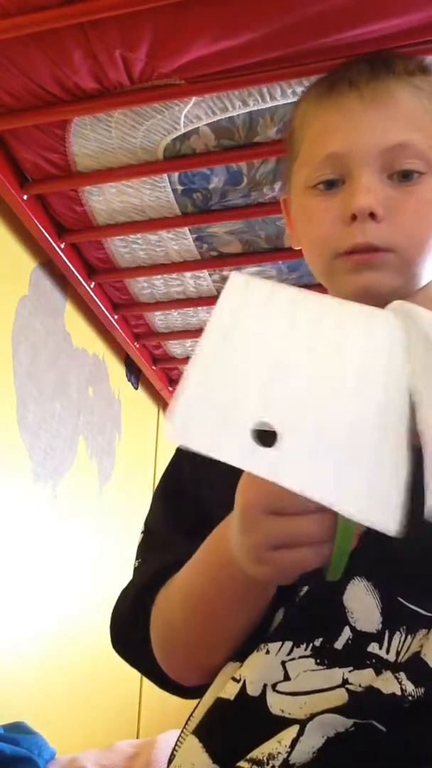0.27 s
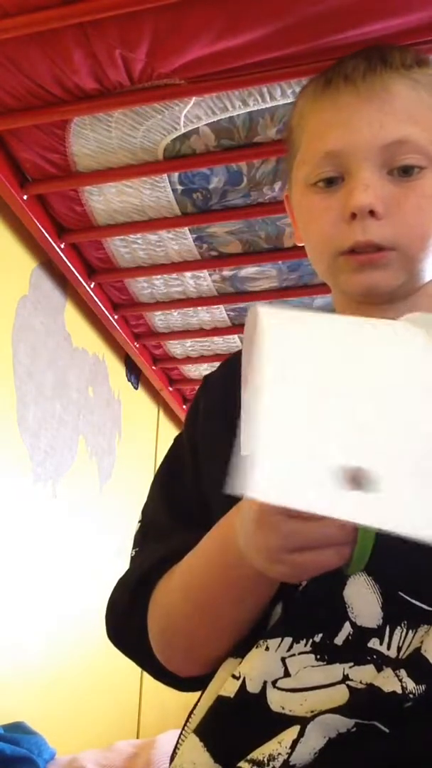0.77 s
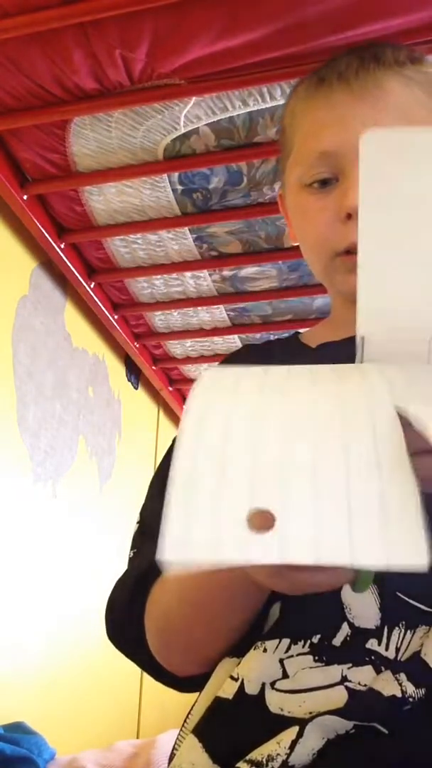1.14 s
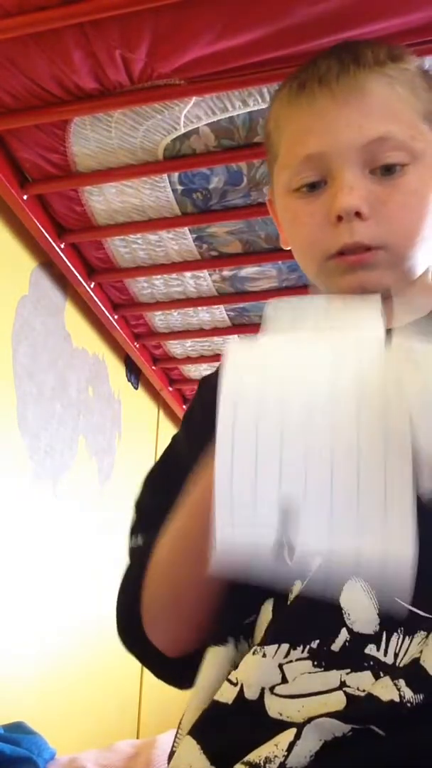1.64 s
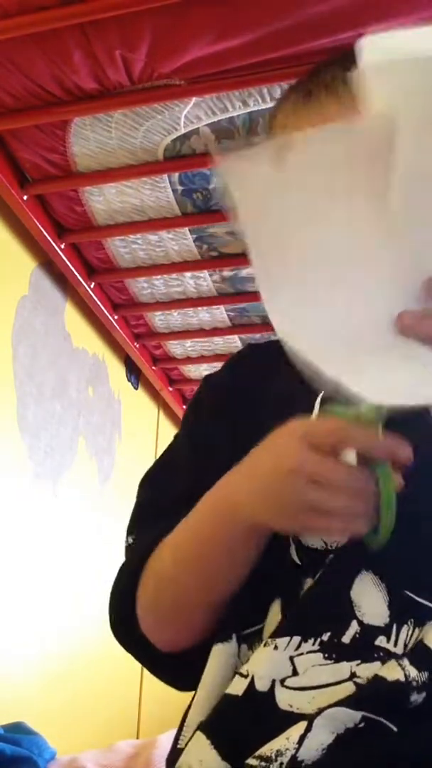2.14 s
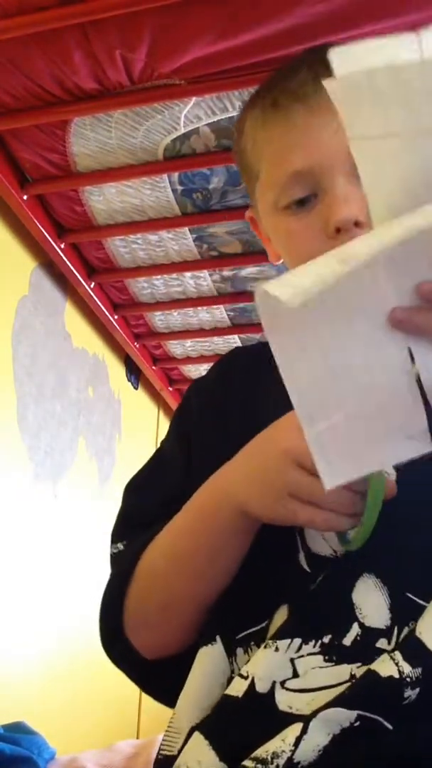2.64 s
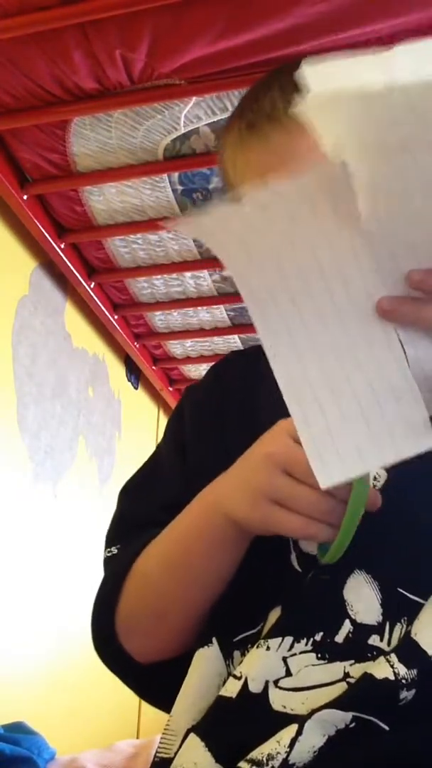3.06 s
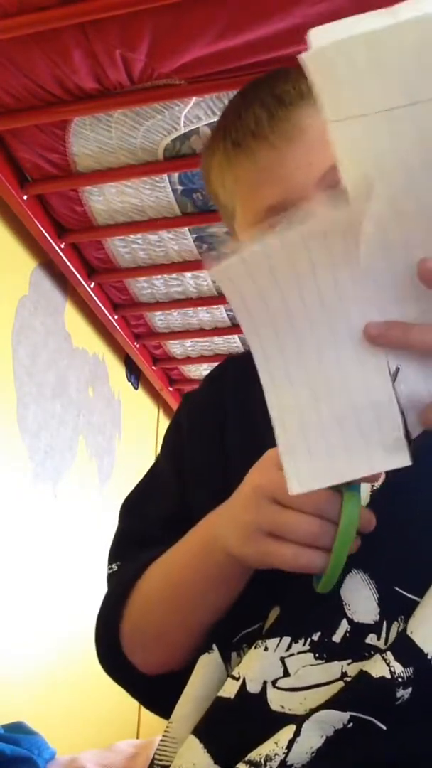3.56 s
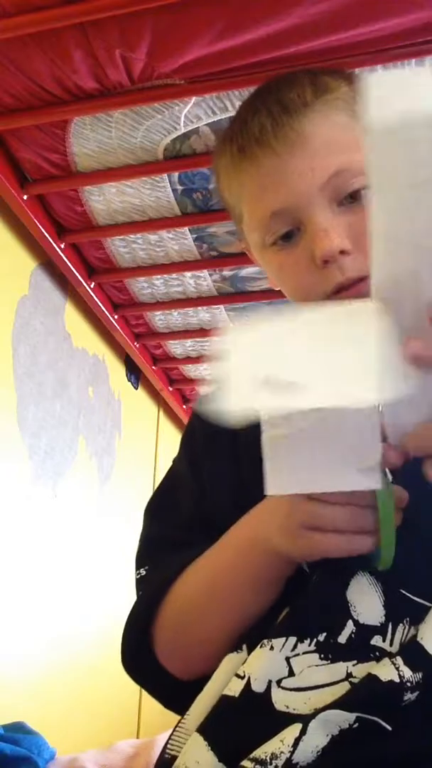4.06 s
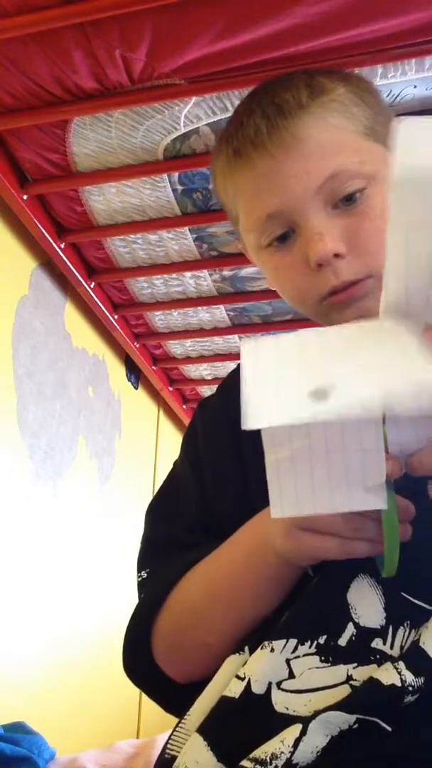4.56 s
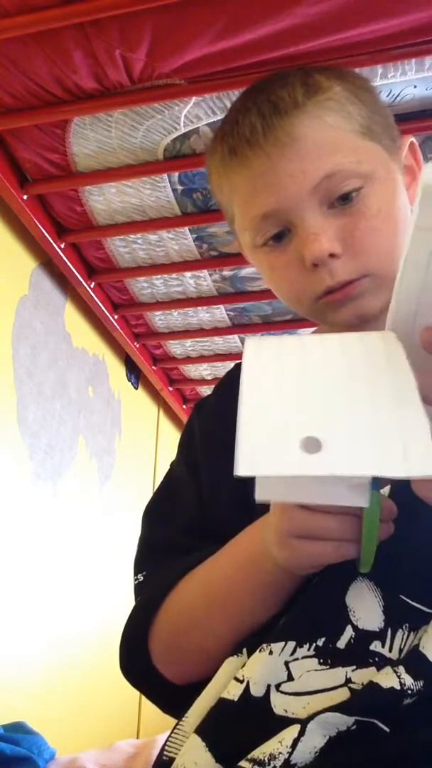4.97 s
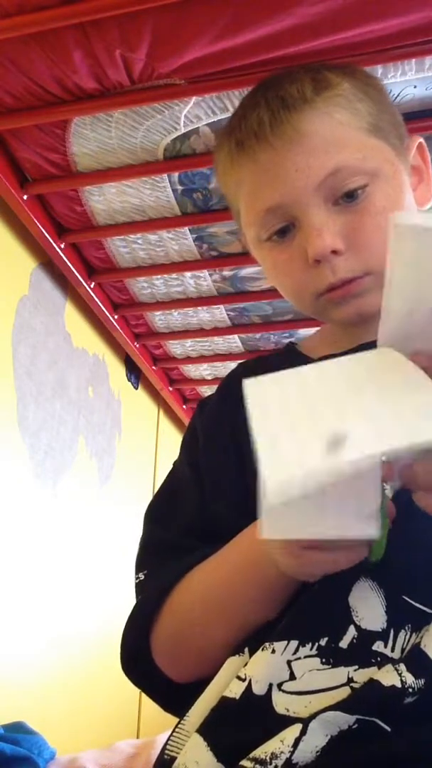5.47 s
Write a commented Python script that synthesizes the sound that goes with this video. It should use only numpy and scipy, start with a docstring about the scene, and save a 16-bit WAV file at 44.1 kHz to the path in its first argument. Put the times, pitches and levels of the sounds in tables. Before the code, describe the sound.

A sheet of notebook paper is turned over and folded by hand, close to the microphone in a small furnished room. It rustles in short, uneven bursts and snaps sharply where it buckles, busiest in the first half. The handling then softens to light sliding and fluttering, with faint fingertip taps and squeaks, before a few more crisp snaps near the end. A faint low rumble lies underneath.

```python
"""Sharp snaps and a papery rustle: a sheet of notebook paper is turned over and folded by hand,
close to the microphone in a small bedroom. The sheet snaps where it buckles. In between, its layers
slide over each other and over the fingers, tiny creases tick, and the loose part flutters, soft and low.
Fingertips tap and squeak faintly on it. The room adds a short echo and a faint rumble."""
import sys
import numpy as np
from scipy import signal
from scipy.fft import rfft, irfft
from scipy.io import wavfile
from scipy.ndimage import uniform_filter1d

SR = 44100
rng = np.random.default_rng(int(sys.argv[2]) if len(sys.argv) > 2 else 0)


def output_pcm(signal):
    """Save a mono or channel-first signal as 16-bit PCM at the path in sys.argv[1].

    Samples are clipped to [-1, 1] before scaling.
    """
    pcm = np.clip(np.atleast_2d(signal).T, -1, 1) * 32767
    wavfile.write(sys.argv[1], SR, np.round(pcm).astype(np.int16))


N = 252252
TIME = np.arange(N) / SR

# How strong each pitch is in a snap: (frequency [Hz], level [dB])
SNAP_TONE = [(40, -21), (90, -16.5), (170, -12), (300, -12), (550, -1.5), (900, -8), (1500, -3.5),
             (2700, 0.5), (5000, -3.5), (7700, -6.5), (9000, -11), (13000, -17), (16000, -32)]
def snap(time_s, level_db, rise_s, fall_s, ring_hz, ring_db, tilt_db, thump_db):
    """A crease gives way: small slips build to one crack and fade, making the paper around it ring."""
    lead = 2048  # samples before the crack
    t = np.arange(-lead, lead) / SR
    hz = np.fft.rfftfreq(len(t), 1 / SR) + 1
    build_up = np.exp(-(t / (1.6 * rise_s + .0003)) ** 2) + 0.077 * np.exp(-abs(t) / (rise_s + .001))
    fade = np.exp(-(abs(t) / (fall_s + 1 / SR)) ** 1.12)
    swell = np.where(t < 0, build_up, fade)
    spectrum = rfft(swell * rng.standard_normal(len(t)) * (rng.random(len(t)) < .5))
    spectrum += 3.2 * rfft(t == 0) / (1 + (hz / 5500) ** 4)  # the crack is duller than the slips
    strength = np.sqrt(uniform_filter1d(abs(spectrum) ** 2, size=61) + 1e-9)
    push = irfft(spectrum / strength)  # together they push all pitches alike
    tone_db = look_up(SNAP_TONE, hz) + tilt_db * np.maximum(np.log2(hz / 2500), 0)
    tone_db += thump_db / (1 + (hz / 800) ** 3)
    tone_db += ring_db / (1 + (np.log2(hz / ring_hz) / 0.19) ** 2)
    sound = signal.fftconvolve(push, paper_click(tone_db))
    ten_ms = SR / 100
    return time_s - lead / SR, amp(level_db) * sound * np.sqrt(ten_ms / np.sum(sound ** 2))


def paper_click(tone_db, spread_s=0.000503):
    """A click in paper rings with the given tone; its short ripples outrun the long ones."""
    cepstrum = irfft(np.log(amp(tone_db)))
    half = len(cepstrum) // 2
    cepstrum[1:half] *= 2  # folding it in half puts the ringing after the click, never before
    cepstrum[half + 1:] = 0
    hz = np.fft.rfftfreq(2 * half, 1 / SR)
    phase_lag = 4 * np.pi * np.sqrt(3000 * hz) * spread_s
    return irfft(np.exp(rfft(cepstrum) - 1j * phase_lag))


# Each time the sheet buckles: (time [s], level over 10 ms [dB], build-up [s], ringing pitch [Hz],
# extra treble [dB per octave], low thump [dB])
BUCKLES = [(0.1416, -44, 0.00033, 2910, 1.5, 19), (0.1949, -27.5, .0002, 1150, -1.5, -23),
           (0.228, -24.5, 0.00015, 6660, -7, -19), (0.2354, -28, 0.0061, 975, -1.5, -11),
           (0.2825, -41.5, 0.00018, 3900, 4, 12), (0.312, -37.5, 0.0023, 1060, 1.5, -11),
           (0.5837, -37.5, 0.00078, 7300, 0, 0), (0.5996, -32.5, 0.0016, 7550, -0.5, 1.5),
           (0.6056, -34.5, 0.0043, 2310, 4, -9), (0.6293, -37, 0.00033, 3160, 9, 17),
           (.6508, -23, 0.0023, 2730, 7.5, 10.5), (0.8951, -33, 0.00035, 2590, 4.5, 9),
           (1.086, -45.5, 0.0019, 2910, 0.5, -2), (1.16, -44.5, 0.00089, 2880, 6, 1),
           (1.24, -43.5, .0005, 1490, -9, 8), (1.368, -34, .0035, 5300, 0, 2),
           (1.509, -33.5, 0.0015, 5130, 7.5, 7.5), (1.5322, -41.5, .0002, 3440, 10, -7),
           (1.5554, -34.5, 0.00089, 3300, 6, -8), (1.5926, -27.5, 0.0064, 6300, 5, -16),
           (1.6492, -34, 0.0037, 4420, 4.5, 12), (1.6838, -31.5, .0003, 1700, 1.5, 9),
           (1.6927, -29, .004, 1520, -2.5, 4), (1.705, -21.5, 0.0017, 6300, -0.5, -10),
           (1.7155, -28.5, 0.0019, 5400, -2.5, -19), (1.8966, -41, .0003, 4730, -6.5, -16),
           (1.9075, -44.5, .001, 7500, 1, -6), (1.9181, -27.5, .0014, 2300, -2, 1.5),
           (1.9646, -36, 0.0006, 2980, 4.5, 0), (2.0952, -34.5, .0002, 1620, -4, 7),
           (2.1092, -19.5, .0034, 820, 1, 9.5), (2.1163, -19, 0.00027, 4340, 7.5, 4),
           (2.1193, -25, .0012, 2800, -0.5, -3), (2.1283, -26.5, .0008, 5920, 1, 8),
           (2.1717, -27, 0.00051, 1030, -1, 2), (2.2879, -27.5, 0.00037, 5300, -2, 1.5),
           (2.616, -44, .0003, 2670, -14, 13.5), (2.6354, -33.5, 0.0011, 4720, -16.5, -9.5),
           (2.865, -43, .0003, 1920, -9, 13), (3.4452, -37, 0.0016, 2510, 0, -8),
           (3.625, -36, 0.002, 4420, 1, -1), (4.2717, -37.5, 0.00037, 3360, 1, -1.5),
           (4.8244, -29.5, 0.00016, 4970, -1, -10.5), (4.876, -45.5, 0.00017, 2500, -6, 5),
           (4.94, -39, 0.00016, 2700, -2.5, -5), (4.9543, -33, 0.00023, 7100, -4.5, -4),
           (4.9689, -37, 0.00044, 2650, -7, -6), (4.9888, -44.5, 0.00023, 2630, 1, 9),
           (5.0271, -23.5, 0.0038, 7400, 1, -4), (5.0745, -35.5, 0.00038, 1150, 1.5, -5),
           (5.114, -36, 0.0028, 2300, -0.5, -9), (5.1973, -32.5, .0005, 1940, -4, -5),
           (5.2028, -27.5, 0.00083, 4560, 1, 2.5), (5.549, -43.5, .0013, 1230, -10, -6),
           (5.5838, -37, 0.0018, 2680, 3.5, 0)]
def buckling():
    """The sheet snaps as it buckles. Slow snaps fade slowly; small, sudden ones ring more clearly."""
    out = np.zeros(N)
    for time_s, level_db, rise_s, ring_hz, tilt_db, thump_db in BUCKLES:
        ring_db = 13.5 - 0.14 * (level_db + 38) - 1300 * rise_s
        fall_s = 0.0022 + rise_s
        add(out, *snap(time_s, level_db, rise_s, fall_s, ring_hz, ring_db, tilt_db, thump_db))
    return out


# Each stroke of paper over paper or skin: (time at full speed [s], run-up [s], hold [s], rasp level [dB],
# fizz compared with rasp [dB], flutter compared with rasp [dB])
STROKES = [(0, .01, 0.0017, -55, -32, -12), (.195, 0.022, 0.065, -41.5, -5.5, -13),
           (0.596, 0.011, 0.062, -48, -5, -4), (0.829, .02, .005, -60, -5.5, -1),
           (.87, 0.013, 0.044, -42, 2, -11), (0.926, .03, 0.09, -40, 1, -7),
           (1.111, .015, 0.024, -50, -3.5, -8), (1.185, .02, 0.0041, -57, -3, -4),
           (1.235, 0.028, 0.055, -44.5, -3, -9.5), (1.355, 0.059, 0.042, -46, 3.5, -13),
           (1.44, 0.029, 0.013, -54, -2.5, -7), (1.577, .055, 0.026, -41.5, 5.5, -21),
           (1.67, 0.056, 0.082, -45, -1, -7.5), (1.77, .03, 0.12, -63.5, 6, -8),
           (1.913, .012, 0.0082, -46.5, -5.5, -2), (2.055, 0.02, .02, -68.5, 5, 5.5),
           (2.109, .008, 0.023, -37, -6.5, -3), (2.16, .02, 0.17, -51.5, -4, -15),
           (2.33, .03, 0.081, -60.5, -5.5, -4), (2.689, 0.028, 0.016, -41.5, -20.5, -7.5),
           (2.792, 0.017, 0.047, -42.5, -11.5, -10.5), (3.02, 0.047, 0.033, -58, -8, -7.5),
           (3.195, 0.065, 0.038, -53.5, -7, -16), (3.32, 0.029, 0.0099, -55.5, -12.5, -19),
           (3.425, .045, 0.023, -48, -9.5, -25), (3.51, 0.017, 0.0074, -54.5, -4.5, -12),
           (3.58, 0.027, 0.027, -53, -2, -25), (3.63, 0.0096, 0.049, -40.5, -10, -16),
           (3.79, 0.038, 0.026, -54.5, -6, -2.5), (3.915, 0.039, 0.049, -49.5, -9.5, -16),
           (4.02, 0.03, 0.051, -58, 3, -4), (4.11, .006, 0.019, -52, -11.5, -3.5),
           (4.193, 0.018, 0.0032, -54.5, -21, -0.5), (4.363, .012, 0.0091, -73.5, 16, -8),
           (4.455, .045, 0.063, -53, -9, -9.5), (4.565, .03, .05, -64, -5.5, -11),
           (4.812, 0.025, 0.017, -56, -8, -8), (5.052, .02, 0.0084, -40, -6.5, -26),
           (5.571, .012, 0.043, -43.5, -1, -12), (5.674, 0.019, .045, -55, 3, -19)]
# Light brushing, as a held sheet never lies quite still: (time [s], level [dB])
LIGHT_BRUSHING = [(0, -57), (.08, -77.5), (.55, -75), (.85, -76.5), (1.45, -64.5), (2.05, -70),
                  (2.55, -78.5), (2.9, -71), (3.35, -70), (3.75, -64), (4.3, -67), (4.75, -66.5),
                  (5.4, -73), (5.72, -60.5)]
def sheet_motion(run_up_db=21.5, coast_db_per_s=421, shiver_db_per_s=329):
    """Brushing, strokes and a shiver after each buckle set how loud rasp, fizz and flutter are."""
    brush_db = np.interp(TIME, *np.transpose(LIGHT_BRUSHING)) + 1.5 * wander(rate_hz=14)
    power = np.outer(amp([0, -7, 0.5]), amp(brush_db)) ** 2  # rows: rasp, fizz, flutter
    t = TIME[:SR // 2]
    for time_s, run_up_s, hold_s, level_db, fizz_db, flutter_db in STROKES:
        since_full_speed = t - 2 * run_up_s
        shape_db = -run_up_db * (np.minimum(since_full_speed, 0) / run_up_s) ** 2
        shape_db -= coast_db_per_s * np.maximum(since_full_speed - hold_s, 0)
        for layer, layer_db in zip(power, (0, fizz_db, flutter_db)):
            add(layer, time_s - 2 * run_up_s, amp(level_db + layer_db + shape_db) ** 2)
    for time_s, level_db, *_ in BUCKLES:
        shiver_db = level_db - 20 - shiver_db_per_s * t
        for layer, layer_db in zip(power, (0, -10, -6.5)):
            add(layer, time_s, amp(shiver_db + layer_db) ** 2)
    return np.sqrt(power)


def fibre_slips(per_s, spread_db, brushing, ring_s):
    """Fibres catch and let go: tiny clicks of uneven size, scattered in the sheet, over a smooth hiss."""
    sizes = amp(spread_db * np.minimum(rng.exponential(1, N), 3))
    clicks = sizes * rng.choice([-1, 1], N) * (rng.random(N) < per_s / SR)
    scatter = np.exp(-TIME[:512] / ring_s) * rng.standard_normal(512)
    scatter = irfft(np.exp(1j * np.angle(rfft(scatter))))  # smears each click but keeps its tone
    return unit_level(signal.oaconvolve(clicks, scatter)[:N]) + brushing * rng.standard_normal(N)


# The tone of the middle rasp, the high fizz and the low flutter: (frequency [Hz], level [dB])
RASP_TONE = [(250, -34.5), (550, -12.5), (900, -12.5), (1300, -2), (2000, 2), (2800, 4), (3900, -2.5),
             (5000, -3), (7000, -20), (10000, -35), (16000, -49.5)]
FIZZ_TONE = [(2500, -44), (4500, -4.5), (5500, -0.5), (7600, 1.5), (8700, -5), (11000, -6), (13300, -9),
             (15200, -14.5), (16000, -40)]
FLUTTER_TONE = [(30, -28), (70, -5), (120, -6.5), (180, 0), (300, -2), (480, 1), (700, -4.5), (1000, -12.5),
                (2500, -42.5)]
def rustling():
    """Sliding layers rasp and fizz; the bending sheet flutters, crinkles and rings at shifting pitches."""
    rasp_gain, fizz_gain, flutter_gain = sheet_motion()
    grip_db = 0.27 * wander(rate_hz=83)  # the hand pulls unevenly
    slips = fibre_slips(per_s=1500, spread_db=5.5, brushing=0.93, ring_s=0.00071)
    rasp = patchy_tone(slips, RASP_TONE, patch_db=3.5, patch_hz=420, patch_s=.015, size=512)
    fizz = patchy_tone(slips, FIZZ_TONE, patch_db=4.0, patch_hz=600, patch_s=.012, size=512)
    flutter = patchy_tone(slips, FLUTTER_TONE, patch_db=2.0, patch_hz=90, patch_s=0.037, size=1024)
    sliding = rasp_gain * rasp + fizz_gain * fizz + flutter_gain * flutter
    return amp(grip_db) * sliding + crinkling(rasp_gain)


def crinkling(rasp_gain, count=260, low_hz=1500, high_hz=7000):
    """Tiny creases tick at random, each as strong as the sheet's motion at that moment."""
    out = np.zeros(N)
    for k, (when, size, pitch) in enumerate(rng.random((count, 3))):
        at = int((k + when) / count * (N - 1))
        relative_db = -13.5 + 9.5 * size ** 2
        ring_hz = low_hz * (high_hz / low_hz) ** pitch
        start_s, tick = snap(at / SR, relative_db, rise_s=0.00029, fall_s=0.0027,
                             ring_hz=ring_hz, ring_db=13.5, tilt_db=4, thump_db=0)
        add(out, start_s, rasp_gain[at] * tick)
    return out


# Each wobble of the sheet: (time [s], peak level [dB], length [s], first pitch [Hz], last pitch [Hz])
SHEET_WOBBLES = [(.225, -48.5, 0.064, 206, 170), (.585, -41.5, 0.032, 187, 180),
                 (.642, -45.5, 0.058, 201, 175), (.89, -38.5, 0.024, 190, 175), (.95, -48, 0.08, 199, 177),
                 (2.225, -55, 0.12, 138.4, 99.5), (2.33, -58, 0.092, 152.4, 118),
                 (2.82, -57, 0.05, 222, 262), (2.965, -54, 0.047, 191, 232), (3.425, -58, 0.052, 219, 203),
                 (3.58, -53.5, 0.073, 172, 106), (4.557, -51, 0.036, 156.4, 166)]
def wobbling():
    """The loose sheet's lowest note swells quickly and fades slowly, gliding as the bend changes."""
    out = np.zeros(N)
    for time_s, level_db, length_s, first_hz, last_hz in SHEET_WOBBLES:
        progress = np.linspace(0, 1, round(length_s * SR))
        cycles = np.cumsum(first_hz + (last_hz - first_hz) * progress) / SR
        swell = np.sin(np.pi * np.sqrt(progress)) ** 2
        add(out, time_s, amp(level_db) * swell * np.sin(2 * np.pi * (cycles + rng.random())))
    return out


# Each tap: (time [s], level over 10 ms [dB], ringing pitch [Hz], extra treble [dB per octave])
FINGER_TAPS = [(.0887, -48.5, 960, -19), (0.4833, -53.5, 920, -4), (2.6054, -50.5, 1980, 1),
               (2.971, -48, 917, -23), (4.0607, -48.5, 6710, -2.5), (4.33, -46, 1180, -14),
               (4.5605, -51.5, 3270, 2), (5.462, -51.5, 2980, 0)]
def tapping():
    """A fingertip lands on the sheet with a dull tap: a soft snap with a strong low thump."""
    out = np.zeros(N)
    for time_s, level_db, ring_hz, tilt_db in FINGER_TAPS:
        add(out, *snap(time_s, level_db, rise_s=.0003, fall_s=.004,
                       ring_hz=ring_hz, ring_db=12.5, tilt_db=tilt_db, thump_db=18))
    return out


# Each drag of a fingertip: (time [s], level [dB], length [s], first pitch [Hz], last pitch [Hz])
FINGER_SQUEAKS = [(0.86, -46.5, 0.022, 1600, 990), (3.513, -60, 0.033, 2020, 1095),
                  (4.102, -51, 0.036, 1847, 1536), (5.538, -46, 0.029, 1336, 1080)]
def squeaking(jitter=0.146, octave_db=-5):
    """Skin sticks and slips unevenly on the paper: a rough, falling note with the octave above it."""
    out = np.zeros(N)
    for time_s, level_db, length_s, first_hz, last_hz in FINGER_SQUEAKS:
        count = round(length_s * SR)
        uneven = unit_level(uniform_filter1d(rng.standard_normal(count), size=30))
        pitch_hz = np.linspace(first_hz, last_hz, count) * (1 + jitter * uneven)
        phase = 2 * np.pi * np.cumsum(pitch_hz) / SR
        note = np.sin(phase) + amp(octave_db) * np.sin(2 * phase)
        add(out, time_s, amp(level_db) * unit_level(note * signal.windows.tukey(count)))
    return out


# How long the room's echo lasts: (frequency [Hz], time to fade by 60 dB [s])
ECHO_FADE = [(150, 0.24), (600, .25), (2500, 0.11), (5000, 0.2), (9000, 0.23), (15000, 0.074)]
def room_echo(sound, early_db, tail_db):
    """Near surfaces throw back a few quick echoes, then the furnished room dies away."""
    size = SR // 2
    echoes = rng.choice([-1., 1.], size) * (rng.random(size) < 4000 / SR)
    hz, t, bands = signal.stft(echoes, SR, nperseg=256)
    fade = amp(-60 * t / look_up(ECHO_FADE, hz)[:, None])
    tail = signal.istft(bands * fade, SR, nperseg=256)[1][:size]
    tail *= np.clip(TIME[:size] / 0.008 - 1, 0, 1)  # comes in between 8 and 16 ms
    early = np.zeros(size)
    early[(rng.uniform(.002, .012, size=8) * SR).astype(int)] = rng.uniform(-0.92, 1, size=8)
    response = amp(early_db) * early / np.linalg.norm(early) + amp(tail_db) * tail / np.linalg.norm(tail)
    return sound + signal.fftconvolve(sound, response)[:N]


# The tone of the background rumble: (frequency [Hz], level [dB])
RUMBLE_TONE = [(20, -17.5), (40, -9), (60, 0.5), (130, -5.5), (250, -9), (450, -12.5), (900, -21.5),
               (2000, -27.5), (5000, -37.5), (10000, -32), (16000, -45.5)]
def house_rumble(level_db):
    """The house rumbles faintly the whole time."""
    noise = rng.standard_normal(N)
    return amp(level_db) * patchy_tone(noise, RUMBLE_TONE, patch_db=5, patch_hz=45, patch_s=.062, size=2048)


def patchy_tone(sound, tone, patch_db, patch_hz, patch_s, size):
    """Gives a sound a tone, with random louder and softer patches across time and pitch."""
    frames = dict(fs=SR, nperseg=size, noverlap=size - size // 4)
    hz, t, bands = signal.stft(sound, **frames)
    patches = rng.standard_normal(bands.shape)
    patches = uniform_filter1d(patches, round(patch_hz / hz[1]), axis=0)
    patches = uniform_filter1d(patches, round(patch_s / t[1]), axis=1)
    bands *= amp(look_up(tone, hz)[:, None] + patch_db * unit_level(patches))
    return unit_level(signal.istft(bands, **frames)[1][:N])


def wander(rate_hz):
    """A random curve that changes up to about this rate."""
    hz = np.fft.rfftfreq(N, 1 / SR)
    return unit_level(irfft(rfft(rng.standard_normal(N)) / (1 + (hz / rate_hz) ** 2), N))


def amp(db):
    """Turns decibels into a number to multiply by."""
    return 10 ** (np.asarray(db) / 20)


def unit_level(sound):
    """Scales a sound to an average (rms) level of 1."""
    return sound / np.sqrt(np.mean(sound ** 2) + 1e-20)


def look_up(table, hz):
    """Reads between a table's rows, with octaves evenly spaced."""
    row_hz, values = np.transpose(table)
    return np.interp(np.log(hz + 1), np.log(row_hz + 1), values)


def add(mix, time_s, sound):
    """Mixes a sound in at the given time."""
    part = mix[max(round(time_s * SR), 0):][:len(sound)]
    part += sound[:len(part)]


def scene():
    """The paper in the room, as one channel."""
    paper = buckling() + tapping() + wobbling() + squeaking() + rustling()
    return (room_echo(paper, early_db=-14, tail_db=-21) + house_rumble(level_db=-66))[None]


def record(dry, low_cut_hz=44, high_cut_hz=15800):
    """The small microphone loses the deepest bass, and the recorder the highest treble."""
    thin = signal.sosfilt(signal.butter(2, low_cut_hz, "highpass", fs=SR, output="sos"), dry)
    treble_cut = signal.firwin(255, high_cut_hz, window=("kaiser", 9), fs=SR)
    return signal.oaconvolve(thin, treble_cut[None], "same")


dry = scene()
out = record(dry)
output_pcm(out)
```